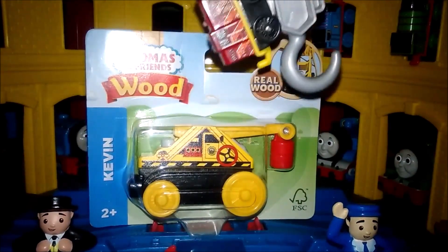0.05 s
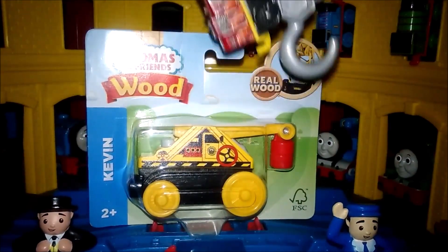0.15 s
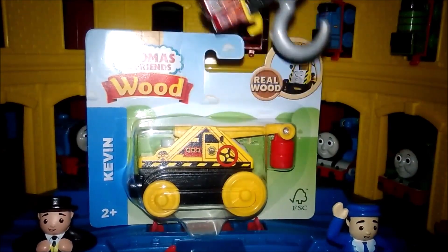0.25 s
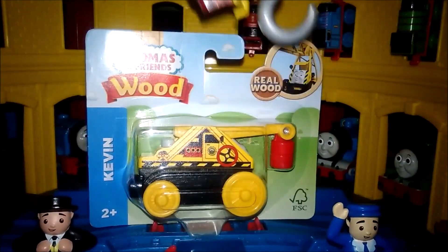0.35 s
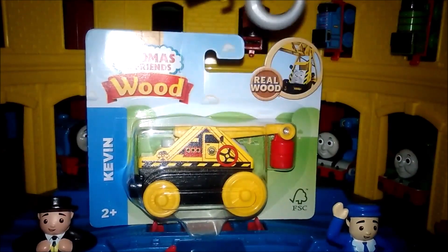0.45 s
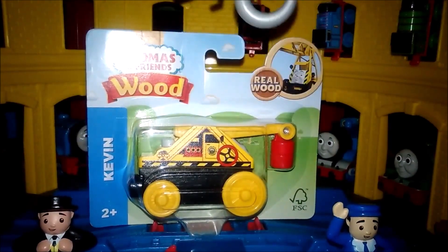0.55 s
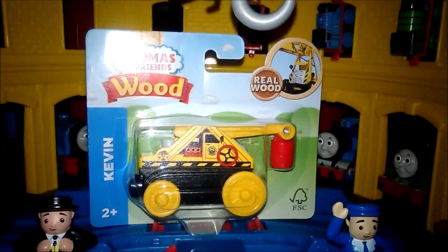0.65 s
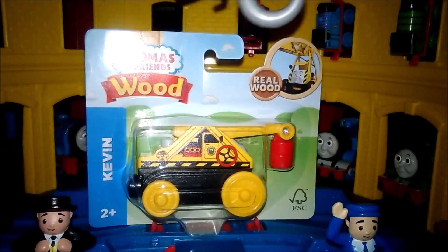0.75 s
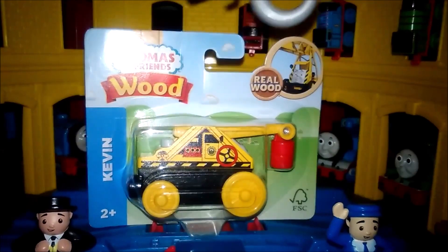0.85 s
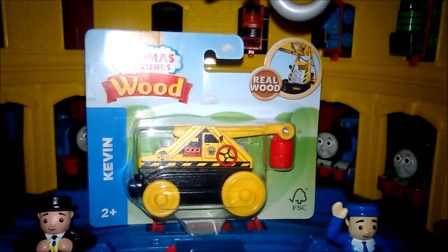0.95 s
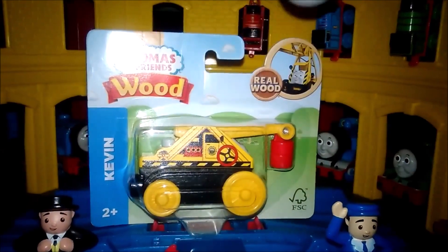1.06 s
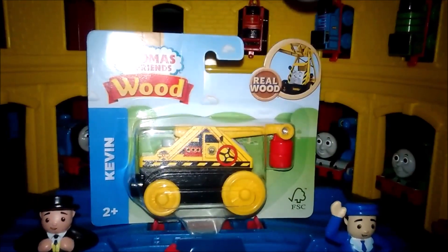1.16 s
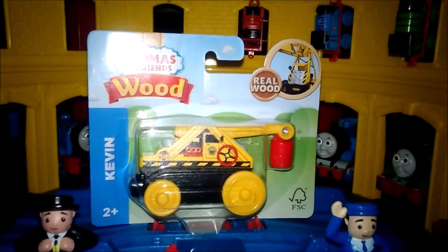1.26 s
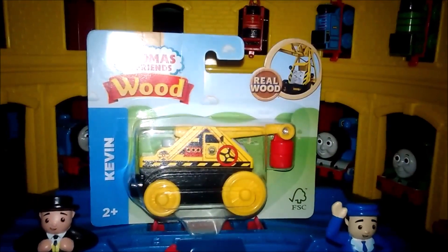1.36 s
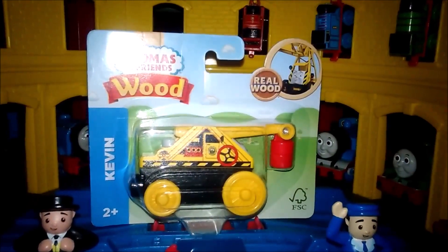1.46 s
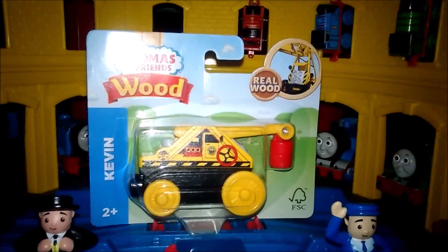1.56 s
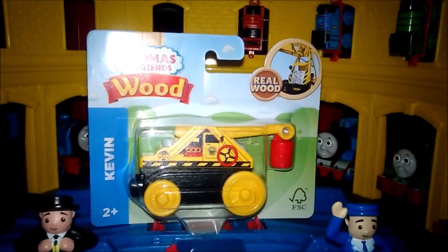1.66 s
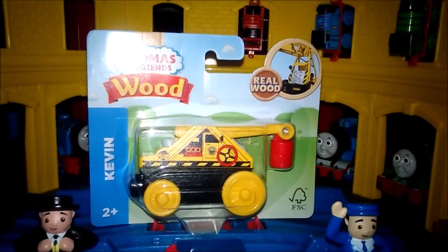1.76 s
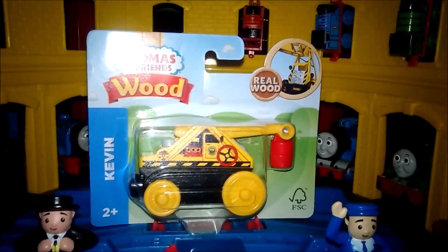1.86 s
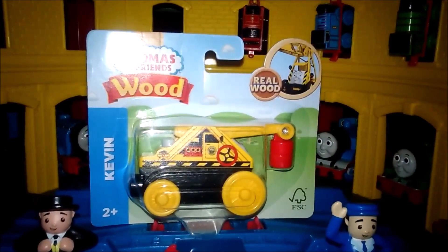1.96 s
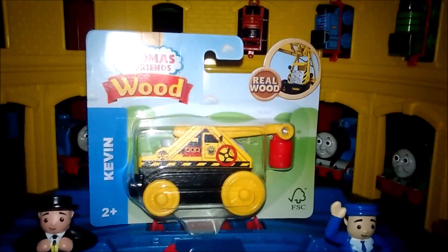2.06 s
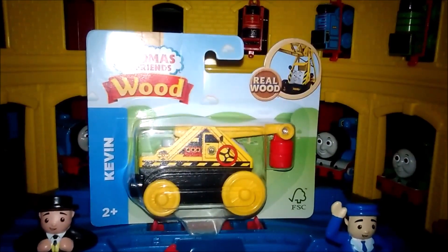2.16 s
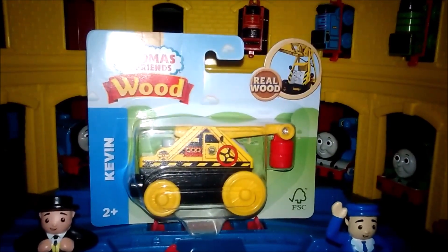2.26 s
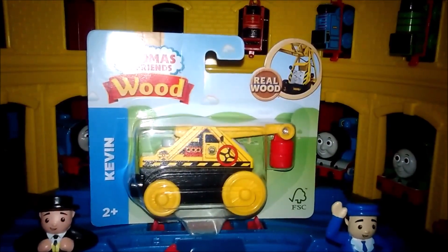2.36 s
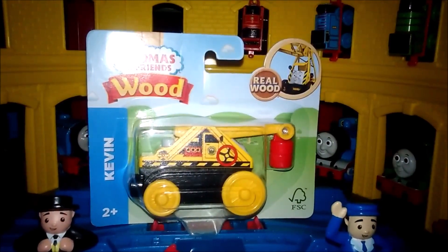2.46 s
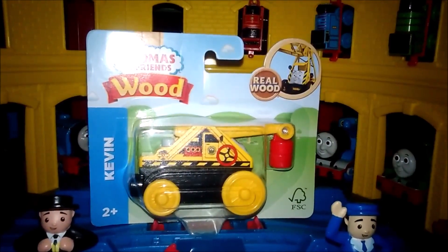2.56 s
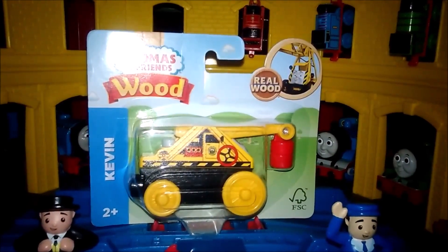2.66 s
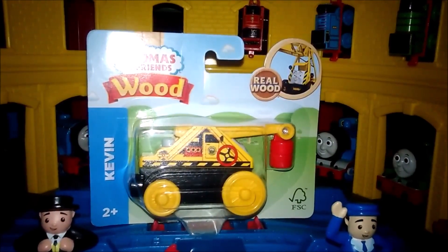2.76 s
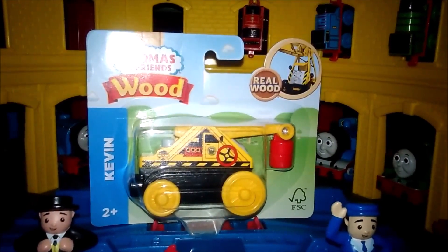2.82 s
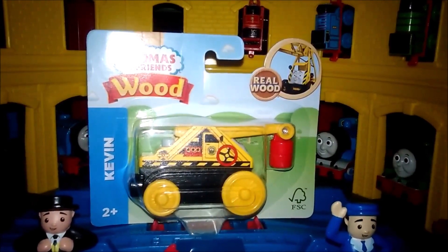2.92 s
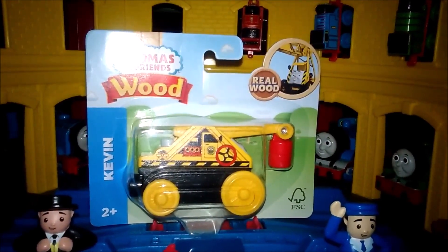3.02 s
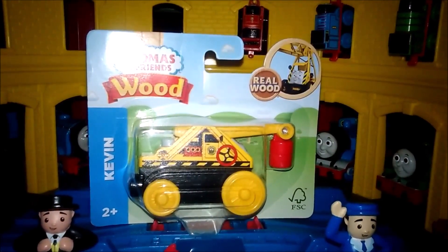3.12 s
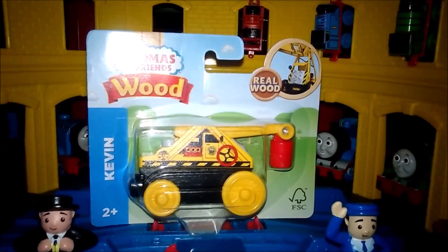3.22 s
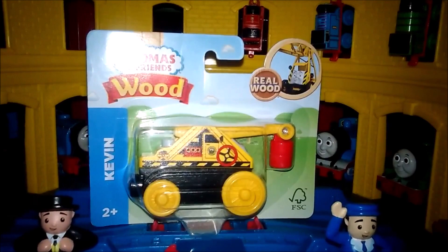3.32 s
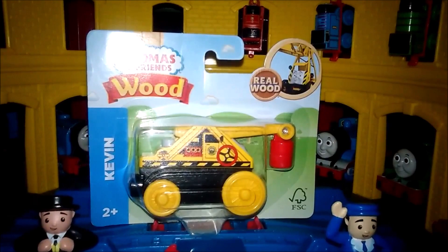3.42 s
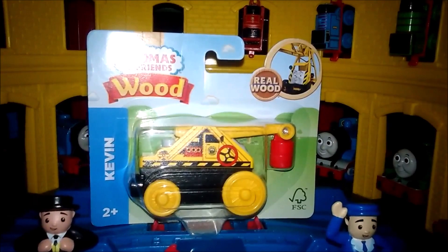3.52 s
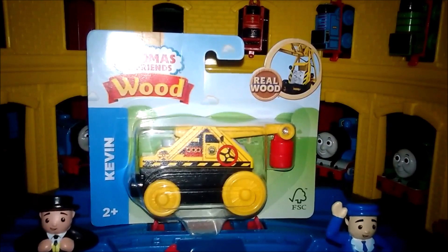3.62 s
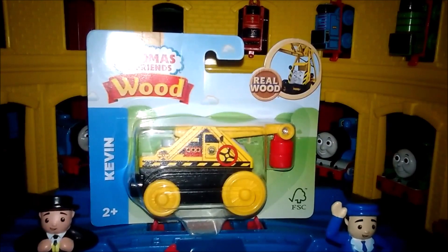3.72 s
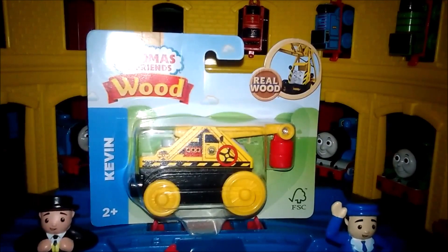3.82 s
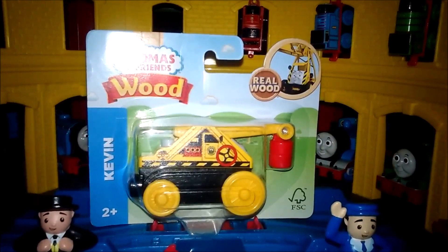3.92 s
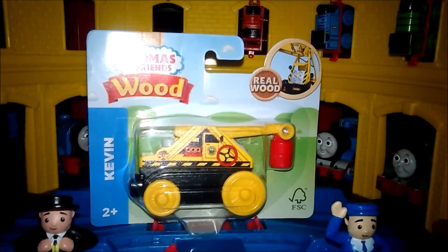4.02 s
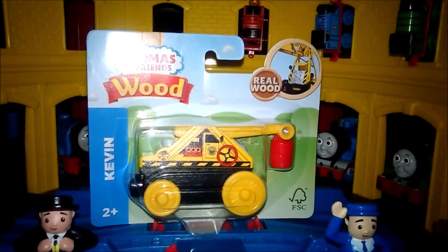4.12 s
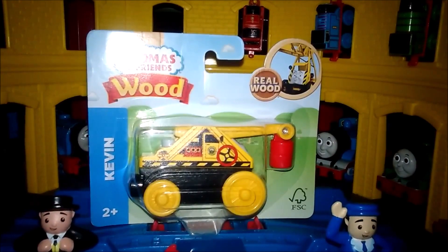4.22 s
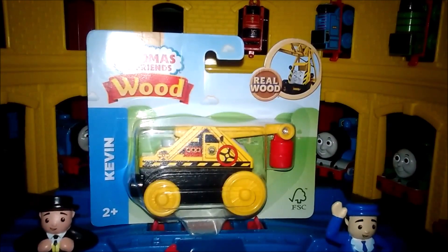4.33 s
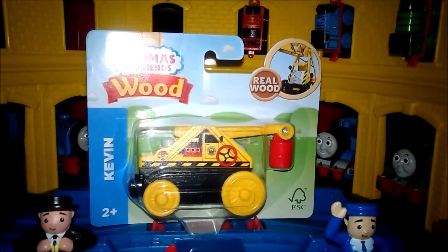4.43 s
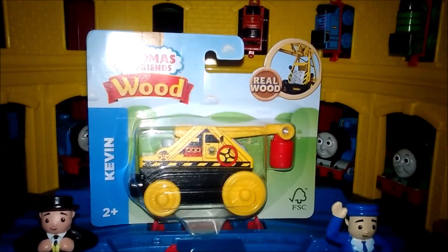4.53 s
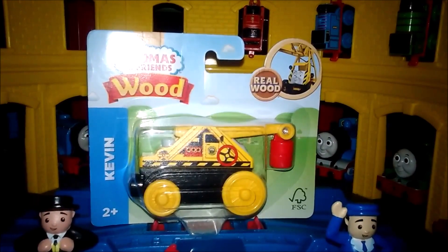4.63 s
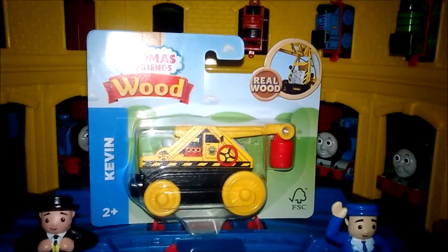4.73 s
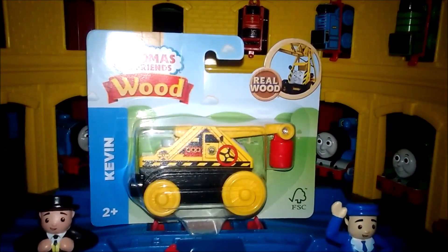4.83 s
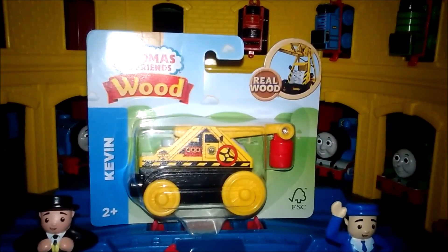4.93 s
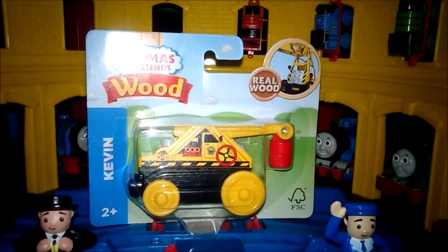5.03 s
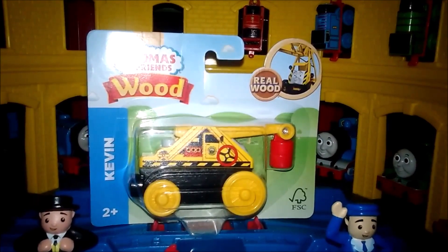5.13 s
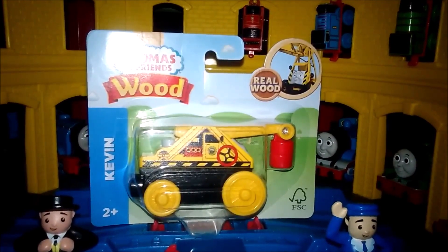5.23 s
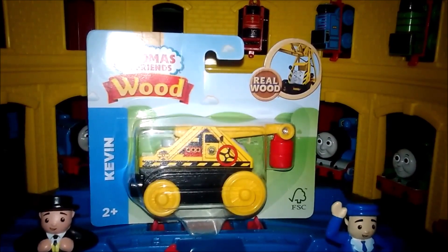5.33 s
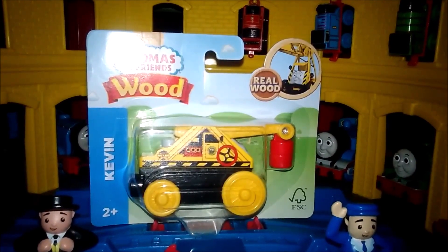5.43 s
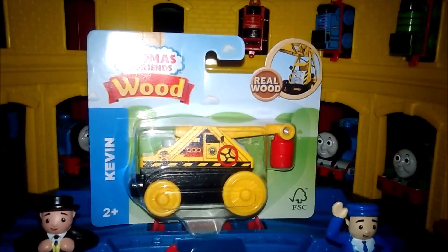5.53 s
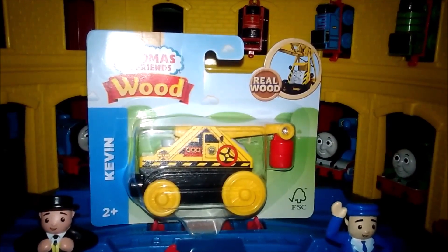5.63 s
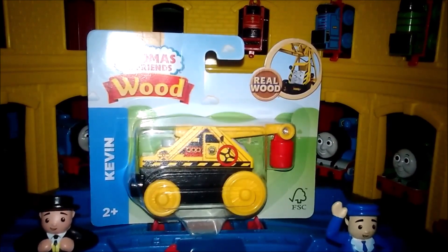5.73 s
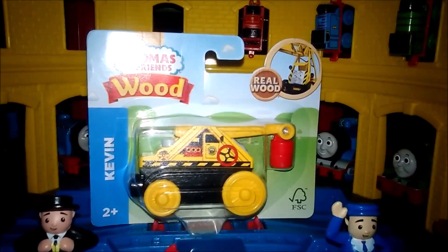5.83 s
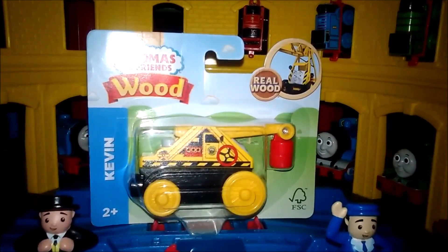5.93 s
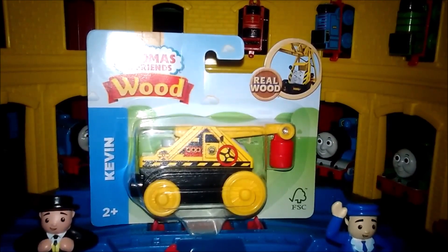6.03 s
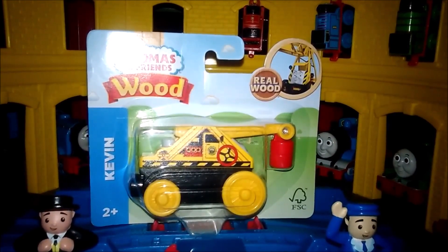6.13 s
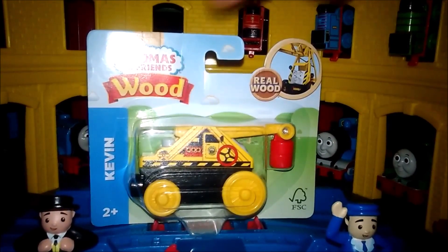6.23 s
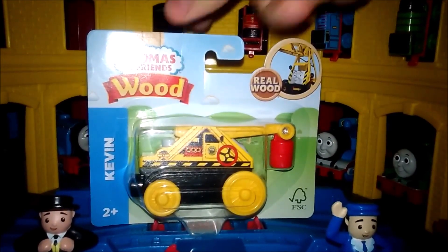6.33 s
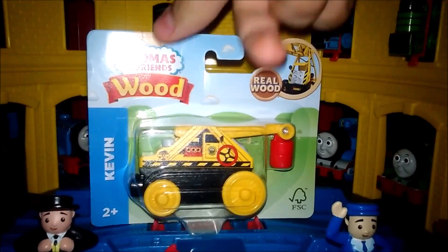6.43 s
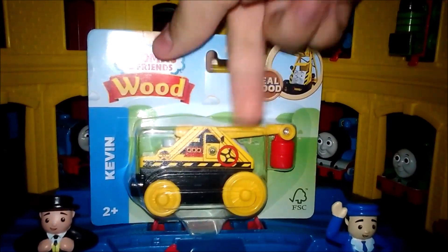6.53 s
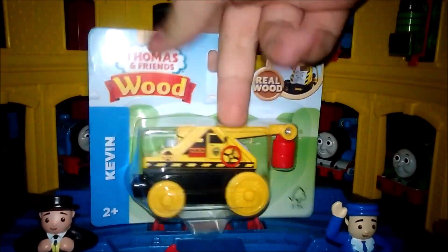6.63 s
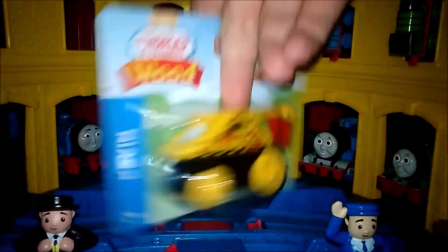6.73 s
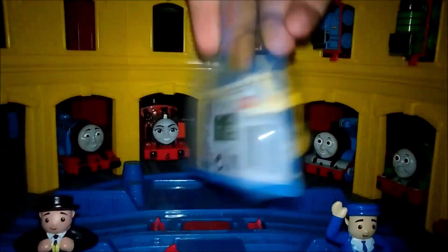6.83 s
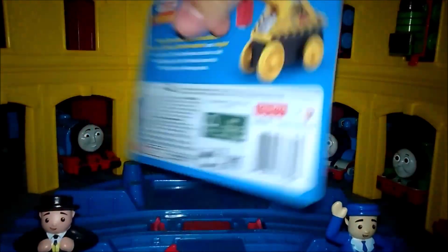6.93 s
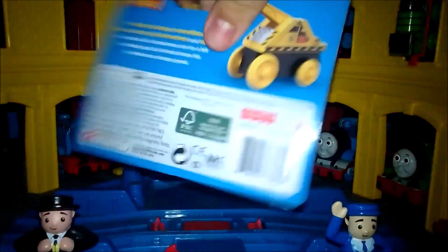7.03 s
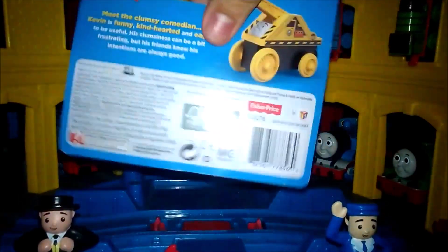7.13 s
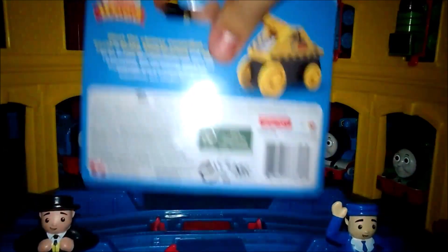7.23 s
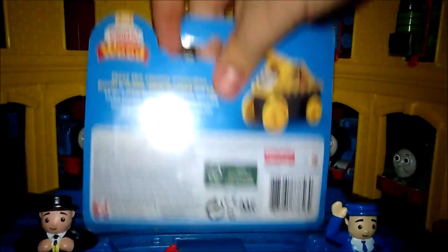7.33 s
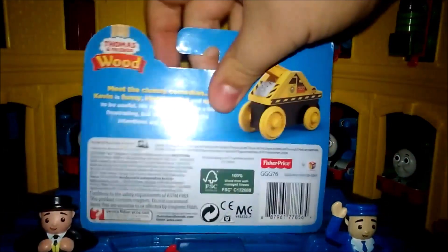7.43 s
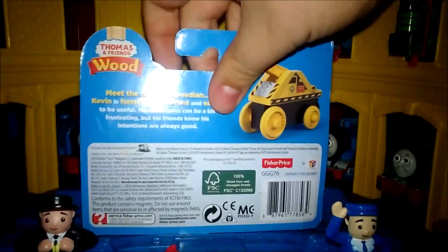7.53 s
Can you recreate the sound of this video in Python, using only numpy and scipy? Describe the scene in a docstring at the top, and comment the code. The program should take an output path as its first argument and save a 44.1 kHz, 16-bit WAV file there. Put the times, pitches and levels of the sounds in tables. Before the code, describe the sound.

Close to the microphone in a small room, a plastic toy crane is wound by hand. Its winch scrapes, squeaks, rattles and clicks in uneven turns, with a few soft low thuds, then snaps sharply twice. A toy in a cardboard pack is lifted and turned over with light scuffs and knocks. A mains hum runs throughout, and in the second half a muffled drone, like an engine outdoors, sinks in pitch and settles.

```python
"""Toy crane in a small room

Close to the microphone a plastic toy crane is wound by hand: the winch scrapes, squeaks, rattles and
clicks, then snaps twice. A toy on a card is picked up and turned over. Soft low thuds come and go.
Mains hum runs throughout; a low drone, like an engine outdoors, sinks in pitch and settles."""
import sys
import numpy as np
from scipy import signal
from scipy.fft import rfft, irfft, next_fast_len
from scipy.io import wavfile
from scipy.ndimage import uniform_filter1d, map_coordinates

SR = 44100
rng = np.random.default_rng(int(sys.argv[2]) if len(sys.argv) > 2 else 0)


def to_wav(s):
    """Save 16-bit WAV."""
    ch = np.atleast_2d(s).T  # columns
    pcm = np.round(np.clip(ch, -1, 1) * 32767)  # PCM
    wavfile.write(sys.argv[1], SR, pcm.astype(np.int16))


N = 333969

# broad colour of the crane's hollow plastic: frequency_hz, gain_db
PLASTIC_COLOUR = [(150, -31.5), (250, -3.5), (296, 3), (389, -3.5), (556, -2.5), (941, -8), (1150, -1.5),
                  (1490, -5.5), (1620, -7), (1920, 1), (3360, -5), (5990, 0.5), (9320, -14), (13500, -20),
                  (14500, -38)]
# resonances of its shell: centre_hz, width_hz, gain_db
SHELL_MODES = [(567, 31, 4.3), (706, 200, 5.4), (1150, 72, 3.8), (1478, 114, 10.1), (1810, 130, 3.9),
               (2380, 57, 1.1), (3690, 45, 8), (4410, 140, 4.2), (5360, 67, 1.33), (6010, 270, 3.4),
               (6810, 790, 6.9), (8520, 170, 2.7)]
HELD_S = (0.25, 5.8)  # the crane is in the hand from, until


def amp(db):
    """Decibels to gain."""
    return 10 ** (np.asarray(db) / 20)


def unit(x):
    """Scale to rms 1."""
    return x / np.sqrt(np.mean(x ** 2) + 1e-20)


def along(points, hz):
    """Read (frequency_hz, value) points on a log frequency axis."""
    points_hz, values = np.transpose(points)
    return np.interp(np.log(hz + 1), np.log(points_hz + 1), values)


def curve(points, outside=None):
    """Join (time_s, value) points into one value per sample."""
    times_s, values = np.transpose(points)
    return np.interp(np.arange(N) / SR, times_s, values, outside, outside)


def wobble(rate):
    """A smooth random curve with rate knots a second."""
    knots = rng.standard_normal(int(N * rate / SR) + 4)
    return map_coordinates(knots, [np.arange(N) * rate / SR])


def coloured(x, gain):
    """Minimum-phase filter with the given gain over frequency."""
    size = 2 * next_fast_len(len(x) // 2 + 4096)
    cepstrum = irfft(np.log(np.maximum(gain(np.fft.rfftfreq(size, 1 / SR)), 1e-6)))
    cepstrum[1:size // 2] *= 2
    cepstrum[size // 2 + 1:] = 0
    return irfft(rfft(x, size) * np.exp(rfft(cepstrum)), size)[:len(x)]


def body(colour, modes=()):
    """Gain over frequency: a broad colour with resonant peaks."""
    def gain(hz):
        peaks_db = sum(db / (1 + (2 * (hz - centre) / width) ** 2) for centre, width, db in modes)
        return amp(along(colour, hz) + peaks_db)
    return gain


def noise(colour):
    """Steady coloured noise of rms 1."""
    return unit(coloured(rng.standard_normal(N), body(colour)))


def below(hz, edge_hz):
    """Smooth step from 1 under the edge to 0 above it."""
    return 1 / (1 + (hz / edge_hz) ** 6)


def two_bands(x, edge_hz, high, low):
    """Set the levels above and under an edge separately."""
    under = irfft(rfft(x) * below(np.fft.rfftfreq(N, 1 / SR), edge_hz), N)
    return high * unit(x - under) + low * unit(under)


def add(track, start_s, sound):
    """Mix a sound into a track."""
    start = max(round(start_s * SR), 0)
    part = track[start:start + len(sound)]
    part += sound[:len(part)]


def contact(gain, rise_s, t60_s, ring_db, ring_t60_s):
    """One blow of rms 1 at its height: a dense crack, then the part's short ring."""
    t = np.arange(SR // 6) / SR
    attack = 1 - np.exp(-(t / rise_s) ** 2)
    decay = amp(-60 * t / t60_s) + amp(ring_db - 60 * t / ring_t60_s)
    hit = coloured(attack * decay * rng.standard_normal(len(t)), gain)
    return hit / np.sqrt(uniform_filter1d(hit ** 2, size=160).max())


def patchy(x, depth_db):
    """Each short moment favours other resonances, as the point of contact moves."""
    spectra = signal.stft(x, nperseg=256)[2]
    patches = rng.standard_normal(spectra.shape)
    for axis in (0, 1, 0, 1):
        patches = uniform_filter1d(patches, size=4, axis=axis)
    return signal.istft(spectra * amp(depth_db * np.tanh(unit(patches))), nperseg=256)[1][:len(x)]


def friction(gain, slips_per_s, spread_db, smooth_db, patchy_db):
    """Tiny slips of random size on a finer rub, heard through a body."""
    slips = (rng.random(N) < slips_per_s / SR) * rng.choice([-1, 1], N)
    sizes = amp(spread_db * np.minimum(rng.exponential(size=N), 3))
    rub = unit(slips * sizes) + amp(smooth_db) * rng.standard_normal(N)
    return coloured(patchy(rub, patchy_db), gain)


def strokes(rows, grip_s, release_db_per_s):
    """Treble and body gain of hand strokes: each swells just before its start, holds and dies away."""
    t, power = np.arange(N) / SR, np.full((2, N), 1e-12)
    for start_s, length_s, high_db, low_db in rows:
        swell = np.clip((t - start_s) / grip_s + 1, 0, 1)
        release = amp(-release_db_per_s * np.clip(t - start_s - length_s, 0, 1))
        power += np.outer(amp([high_db, low_db]), swell * release) ** 2
    return np.sqrt(power)


def room_tone():
    """The room itself: mains hum, an uneven rumble, a low murmur and hiss."""
    # steady tones of the hum: pitch_hz, level_db
    hum_tones = [(120, -38.5), (167, -83), (199, -64), (311, -57.5)]
    # rise and fall of the rumble: time_s, relative_db
    rumble_levels = [(0.0, -42), (0.19, -48), (1.22, -39), (1.71, -45), (2.11, -36), (3.94, -35),
                     (4.19, -42.5), (4.98, -38), (5.29, -35.5), (7.04, -42), (7.34, -27), (7.57, -35.5)]
    # spectra of the rumble, the murmur and the hiss: frequency_hz, gain_db
    rumble_colour = [(10, -4.5), (20, 0), (35, -6), (60, -9.5), (100, -12.5), (140, -28.5), (230, -71.5)]
    murmur_colour = [(60, -32.5), (110, -4), (220, -2.5), (330, -7), (500, -17.5), (800, -42), (2000, -85)]
    hiss_colour = [(150, 0), (700, 0), (1000, -4), (2000, -8), (3500, -11.5), (7000, -12), (8500, -16),
                   (14500, -19)]
    t = np.arange(N) / SR
    hum = sum(amp(db) * np.sqrt(2) * np.sin(2 * np.pi * hz * t + 0.039 * wobble(5))
              for hz, db in hum_tones)
    rumble = amp(curve(rumble_levels) + 6.5) * noise(rumble_colour)
    hiss = amp(-52) * noise(hiss_colour)
    murmur = amp(-47.5) * noise(murmur_colour)
    return hum + rumble + murmur + hiss


def reflections(x):
    """The near walls answer, a little differently from moment to moment as things move."""
    # decay of the small room: frequency_hz, t60_s
    decay_times = [(200, 0.38), (1500, 0.24), (6000, 0.26), (14000, 0.25)]
    out, block = np.zeros(N), SR // 4
    for start in range(0, N, block):
        hz, t, spectra = signal.stft(rng.standard_normal(SR // 2), SR, nperseg=256)
        decay = amp(-60 * t / along(decay_times, hz)[:, None])
        tail = signal.istft(spectra * decay, SR, nperseg=256)[1]
        echo = signal.fftconvolve(x[start:start + block], tail / np.linalg.norm(tail))
        add(out, start / SR + 0.005, echo)
    return out


def engine():
    """Outdoors: only the firing note and a dull roar pass the walls. Twice the note sinks from high."""
    # loudness of the engine indoors: time_s, level_db
    levels = [(3.8, -56), (3.86, -32), (4.35, -29.5), (4.72, -38), (4.95, -27), (5.06, -34.5), (5.4, -40.5),
              (5.97, -43), (6.13, -23.5), (6.27, -24), (6.39, -16.5), (6.6, -20.5), (7.2, -23), (7.57, -31)]
    high_hz, low_hz, sink_octaves_per_s = 116, 64.3, 0.8
    t, hz = np.arange(N) / SR, high_hz
    for start_s in (3.84, 5.02):
        sinking_hz = high_hz * 2 ** (-sink_octaves_per_s * (t - start_s))
        hz = np.where(t < start_s, hz, np.maximum(sinking_hz, low_hz))
    roar = noise([(40, -44), (75, -6), (95, 6), (130, -13.5), (190, -35), (400, -60)])
    phase = 2 * np.pi * np.cumsum(hz * (1 + 0.005 * wobble(11))) / SR
    note = np.sqrt(2) * (np.sin(phase) + amp(-23.5) * np.sin(2 * phase))
    return amp(curve(levels, outside=-120) + 0.7 * wobble(15)) * (note + amp(-10) * roar)


def low_thuds():
    """Soft low thuds and brief low swells of drone, each a tone that rises and fades."""
    # thuds and swells: crest_s, peak_db, pitch_hz, fade_cycles
    thuds = [(0.884, -21.5, 40.2, 1.1), (1.961, -21, 32.2, 1.9), (2.339, -8, 50.6, 0.46),
             (2.669, -17.5, 37.5, 0.97), (2.709, -9.5, 47, 0.79), (2.713, -19, 157, 1.1),
             (2.759, -13.5, 57.5, 0.83), (2.852, -16, 37.2, 1.15), (3.084, -10, 28.8, 0.45),
             (3.686, -12.5, 107.6, 2.06), (3.789, -27, 60.8, 6.5), (5.737, -13.5, 35, 0.31),
             (7.17, -15.5, 41.4, 0.69), (7.293, -6, 40, 0.77), (7.482, -17.5, 205, 1.3)]
    out, t = np.zeros(N), np.arange(-SR // 5, SR // 5) / SR
    for crest_s, db, hz, cycles in thuds:
        swell = np.exp(-(t * hz / cycles) ** 2)
        add(out, crest_s + t[0], -amp(db) * swell * np.cos(2 * np.pi * hz * t))
    return out


def card_pack():
    """The cardboard pack drags off its stand and knocks as it is turned."""
    # hollow notes of the pack: centre_hz, width_hz, gain_db
    board_modes = [(407, 52, 9), (612, 57, 6.5), (953, 430, 2.5)]
    # spectra of the dragging edge and of the struck pack: frequency_hz, gain_db
    rasp_colour = [(150, -25), (250, -5), (469, -23), (565, -19), (864, -3), (1860, -13), (2160, -6.5),
                   (2700, -15), (3540, -11.5), (5320, -16), (6870, -9), (8560, -24), (14500, -38)]
    knock_colour = [(100, -18), (200, 9.5), (400, -8.5), (700, -0.5), (1200, -4.5), (1700, -8),
                    (2500, -14.5), (4000, -15.5), (6500, -14.5), (8400, -27.5), (10000, -43), (14500, -47)]
    # scuffs as it is lifted: start_s, length_s, rasp_db, board_db
    drags = [(6.757, 0.0065, -35, -34), (6.792, 0.016, -26, -24), (6.955, 0.022, -40.5, -35.5)]
    # knocks on the card: start_s, relative_db, board_boost_db, edge_boost_db
    knocks = [(6.681, -24.5, -0.5, 2), (6.792, -17, 8, -6), (6.847, -28, -20, 2), (7.111, -25, -4, 17),
              (7.172, -36.5, -9, -1), (7.4724, -9, -4, 8), (7.563, -17, 7, -11)]
    rub = friction(body(rasp_colour, board_modes),
                   slips_per_s=400, spread_db=-0.5, smooth_db=-0.5, patchy_db=6.5)
    rasp, board = strokes(drags, grip_s=0.023, release_db_per_s=600)
    out = two_bands(rub, edge_hz=2040, high=rasp, low=board)
    for start_s, db, board_db, edge_db in knocks:
        def spot(hz):
            tilt_db = board_db * below(hz, 1600) + edge_db * (1 - below(hz, 6200))
            return body(knock_colour, board_modes)(hz) * amp(tilt_db)
        knock = contact(spot, rise_s=0.00087, t60_s=0.024, ring_db=-6, ring_t60_s=0.11)
        add(out, start_s, amp(db - 3.5) * knock)
    return out


def cranking():
    """How hard the drum scrapes and shakes the shell: separate turns over a slow creep."""
    # turns of the crank by hand: start_s, length_s, scrape_db, shell_db
    turns = [(.245, 0.033, -44.5, -48.5), (.375, 0.087, -42.5, -41), (.49, 0.073, -40.5, -39),
             (.795, 0.043, -50, -50), (.875, 0.07, -38, -36.5), (1.025, 0.029, -54, -43.5),
             (1.13, 0.039, -48.5, -46), (1.34, 0.29, -53, -48), (1.55, 0.26, -45.5, -45.5),
             (1.835, 0.045, -41.5, -40), (2.075, 0.032, -42, -39), (2.355, 0.031, -38, -36),
             (2.405, 0.069, -32.5, -33.5), (2.51, 0.1, -32.5, -34.5), (2.64, .17, -34, -36.5),
             (2.865, 0.09, -36, -36.5), (3.0, 0.055, -37.5, -40), (3.06, 0.33, -46.5, -43),
             (3.295, 0.23, -39.5, -38), (3.61, 0.038, -47.5, -41), (3.925, 0.11, -46, -44),
             (4.005, 0.063, -41, -41), (4.18, 0.062, -36, -35.5), (4.27, 0.065, -35.5, -34.5),
             (4.37, 0.065, -44.5, -42.5), (4.48, 0.11, -45, -42), (4.68, 0.03, -41.5, -39.5),
             (4.965, .04, -54, -45), (5.085, 0.037, -41.5, -44), (5.155, 0.16, -40.5, -37.5),
             (5.385, 0.025, -45.5, -43), (5.62, .07, -34.5, -37), (5.7, 0.05, -40.5, -41),
             (5.76, 0.022, -53.5, -55)]
    creep = (HELD_S[0], HELD_S[1] - HELD_S[0], -53.5, -50)
    return strokes(turns + [creep], grip_s=0.018, release_db_per_s=336)


def winch(scrape, shell):
    """The drum rubs in its bearing, catching unevenly many times a second."""
    rub = friction(body(PLASTIC_COLOUR, SHELL_MODES),
                   slips_per_s=2000, spread_db=1, smooth_db=-2.5, patchy_db=5)
    catches = amp(2.77 * np.tanh(wobble(110)))
    return amp(-0.5) * two_bands(rub * catches, edge_hz=3120, high=scrape, low=shell)


def squeaks():
    """Plastic sticks and slips on plastic, at a pitch that cannot hold steady."""
    # squeaky rubs of the crank: middle_s, level_db, pitch_hz, length_s
    rubs = [(1.39, -41, 2195, .09), (1.85, -32, 2200, .02), (2.038, -37, 1813, 0.026),
            (3.33, -39, 1510, 0.072), (3.842, -38.5, 1814, 0.049), (4.21, -32, 1966, 0.033),
            (4.344, -29, 1930, .016), (5.735, -28, 2660, 0.0077)]
    out, t = np.zeros(N), np.arange(N) / SR
    wavering_time = np.cumsum(1 + 0.13 * wobble(900)) / SR
    grip = unit(amp(5.7 * np.tanh(wobble(300))))
    for middle_s, db, hz, length_s in rubs:
        swell = np.exp(-(2 * (t - middle_s) / length_s) ** 2)
        out += amp(db) * grip * swell * np.sin(2 * np.pi * hz * wavering_time)
    return out


def click(shell_db):
    """A loose part scuffs the shell at a spot with its own brightness and resonances."""
    grid_hz = np.arange(0, SR / 2, 450)
    spot_db = 4 * np.tanh(rng.standard_normal(len(grid_hz)))

    def spot(hz):
        tilt_db = shell_db * below(hz, 2030) - 11.5 * (1 - below(hz, 8360))
        return body(PLASTIC_COLOUR, SHELL_MODES)(hz) * amp(np.interp(hz, grid_hz, spot_db) + tilt_db)
    return contact(spot, rise_s=0.003, t60_s=0.0087, ring_db=-21.5, ring_t60_s=0.075)


def rattle(scrape):
    """Loose parts chatter at random, as loudly as the crank is turned."""
    rattles_per_s, spread_db = 9, 11.5
    out, slots = np.zeros(N), np.arange(*HELD_S, 1 / rattles_per_s)
    for slot_s, (late, size, dull) in zip(slots, rng.random((len(slots), 3))):
        start_s = slot_s + late / rattles_per_s
        gain = scrape[int(start_s * SR)] * amp(2.5 + spread_db * (2 * size - 1.5))
        add(out, start_s, gain * click(shell_db=6.6 * (2 * dull - 2.5)))
    return out


def winch_clicks():
    """The winch catches and jumps."""
    # clear clicks: time_s, level_db, shell_boost_db
    jumps = [(0.3333, -40, -21), (0.5445, -34.5, 16), (.637, -33.5, -1), (.725, -38.5, 10),
             (0.7988, -29, 7.5), (0.8655, -28, -7), (0.8968, -31.5, -17), (1.035, -34.5, -1),
             (1.2348, -37, 9), (1.451, -31.5, -8), (1.5901, -26.5, -1), (1.6214, -34, -4), (1.711, -33, 3),
             (1.7669, -34, 9), (1.8152, -30.5, -8), (1.828, -30, -6), (1.8477, -30, -11), (2.0268, -31, -8),
             (2.051, -33, -15), (2.0814, -30, -16), (2.1753, -38.5, -3), (2.2249, -36, 1),
             (2.4032, -27, -10), (2.4177, -20, -8), (2.4519, -27.5, 2), (2.4928, -20, -10),
             (2.6244, -21, -5.5), (2.6947, -19, -9), (2.7291, -19.5, 0), (2.798, -18.5, -14),
             (2.802, -18, -30), (2.8677, -23, -13), (2.911, -25.5, -8), (2.9925, -28, -6),
             (3.0032, -25.5, 3), (3.3265, -29.5, -10), (3.7364, -23, -6), (3.747, -37, -7),
             (3.926, -41, -12), (4.0094, -30, -1), (4.1964, -30, 0), (4.2204, -25, -11), (4.2528, -22, -33),
             (4.301, -27.5, -5), (4.4843, -31, 8.5), (4.714, -28.5, -4), (4.8546, -29, 12.5),
             (4.8885, -36, -8), (4.9496, -42, -13), (5.0928, -32.5, 5), (5.3912, -36, 4), (5.733, -37, 3),
             (5.894, -42, 2), (5.922, -35, -8)]
    out = np.zeros(N)
    for time_s, db, shell_db in jumps:
        add(out, time_s - 0.001, amp(db) * click(shell_db))
    return out


def snaps():
    """Strained plastic lets go and the whole crane rings."""
    # two hard snaps and a light one: start_s, relative_db
    releases = [(5.4686, 1), (5.5629, 1.5), (5.917, -21.5)]
    # spectrum of the crack: frequency_hz, gain_db
    colour = [(120, -22), (250, -19.5), (400, -9.5), (620, -7.5), (950, -5), (1600, -10), (2300, 0),
              (3600, -7.5), (4600, -2), (6300, -2), (7600, -13.5), (10700, -12), (13000, -25), (15000, -33)]
    # resonances it excites: centre_hz, width_hz, gain_db
    modes = [(643, 440, 5.5), (2100, 300, 0.5), (4940, 300, -1.5), (5400, 300, 2.5), (5760, 80, -1),
             (6800, 71, 14)]
    out = np.zeros(N)
    for start_s, db in releases:
        crack = contact(body(colour, modes), rise_s=0.0011, t60_s=0.016, ring_db=-16, ring_t60_s=0.15)
        add(out, start_s, amp(db - 6) * crack)
    return out


def scene():
    """A faint, bright stereo shimmer and hiss surround the centred sounds."""
    # spectrum of the shimmer and its hiss: frequency_hz, gain_db
    shimmer_colour = [(2500, -77.5), (4000, -57), (5000, -20.5), (7000, -6), (9000, -1), (12000, -3),
                      (14000, -7)]
    scrape, shell = cranking()
    crane = winch(scrape, shell) + winch_clicks() + squeaks() + rattle(scrape)
    cracks, pack = snaps(), card_pack()
    echo = reflections(amp(-11) * crane + amp(-10) * cracks + amp(-13) * pack)
    mid = crane + cracks + pack + echo + low_thuds() + engine() + room_tone()
    hiss = amp(-57.5) * rng.standard_normal(N)
    shimmer = reflections(amp(-5) * crane + amp(-14) * cracks + amp(-12.5) * pack)
    side = coloured(shimmer + hiss, body(shimmer_colour))
    return np.array([mid + side, mid - side])


def record(dry):
    """The microphone input saturates softly at full scale and keeps nothing above its band limit."""
    top_hz = 14400
    saturated = dry / (1 + np.abs(dry) ** 8) ** (1 / 8)
    return irfft(rfft(saturated) * (np.fft.rfftfreq(N, 1 / SR) < top_hz), N)


dry = scene()
out = record(dry)
to_wav(out)
```